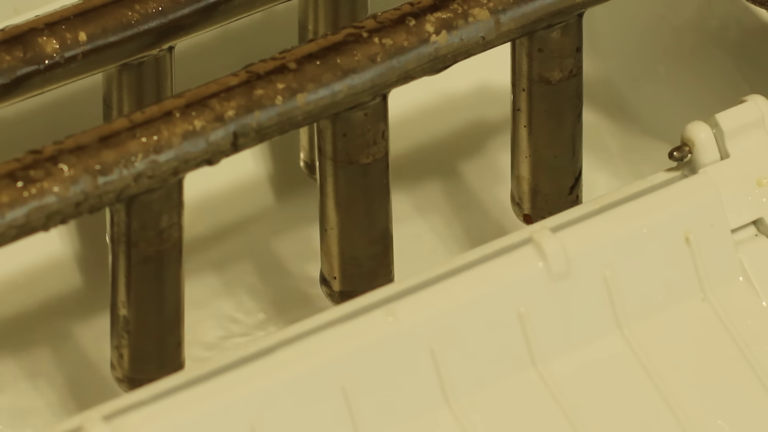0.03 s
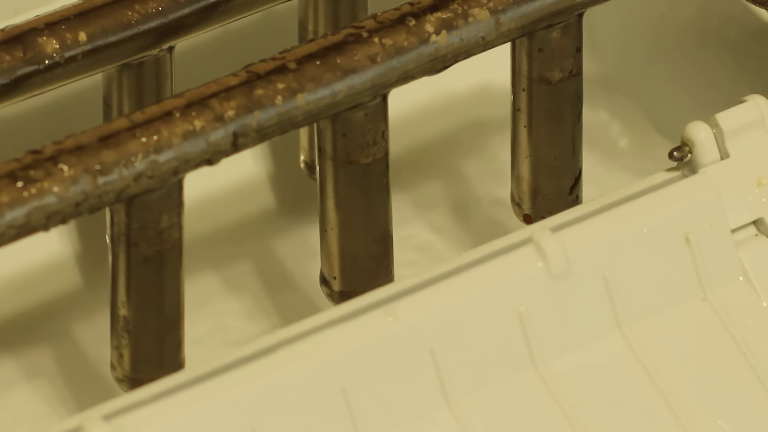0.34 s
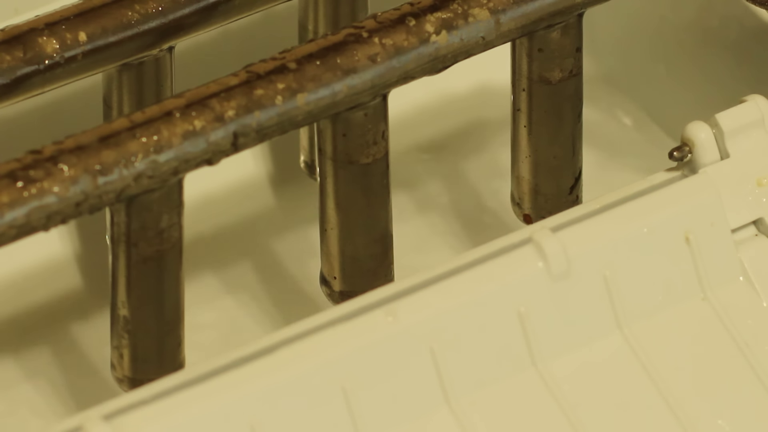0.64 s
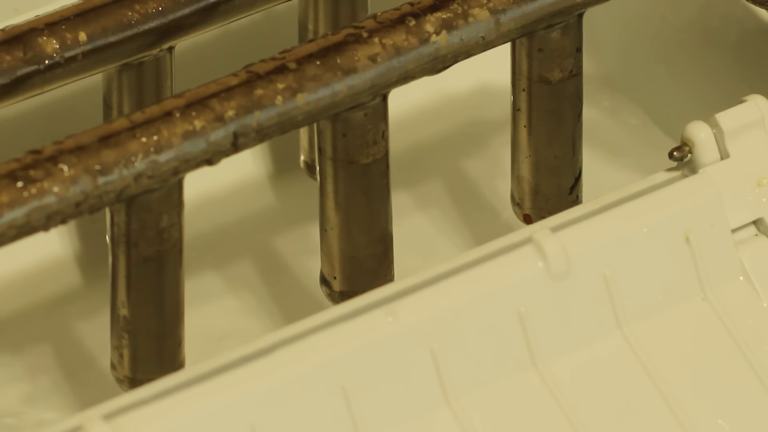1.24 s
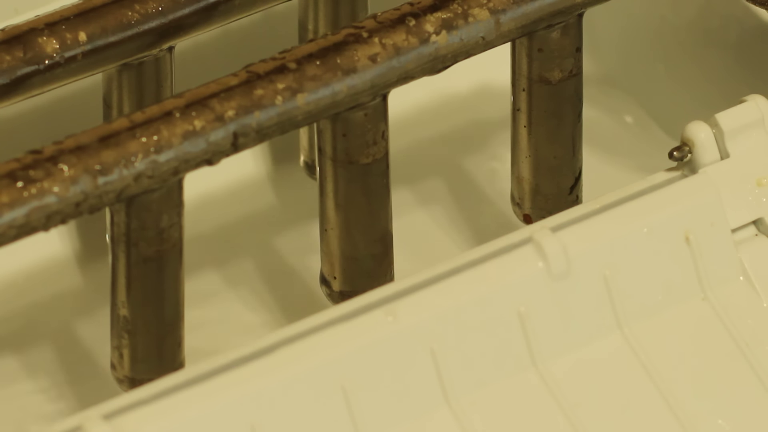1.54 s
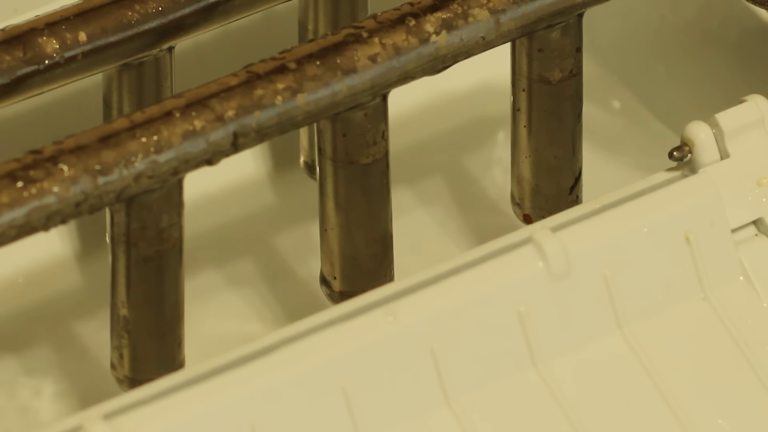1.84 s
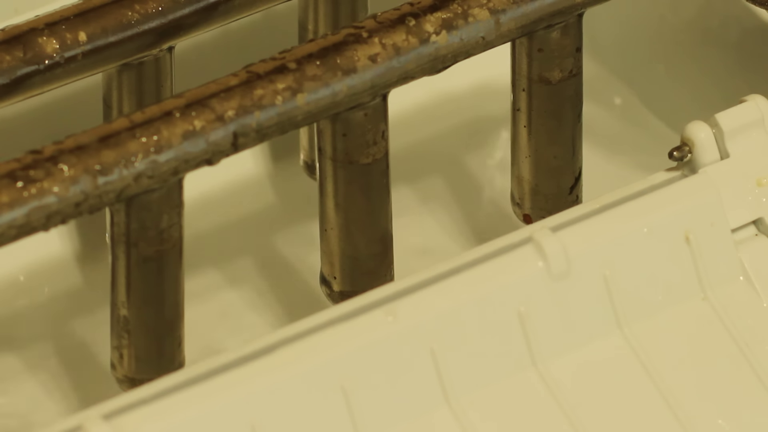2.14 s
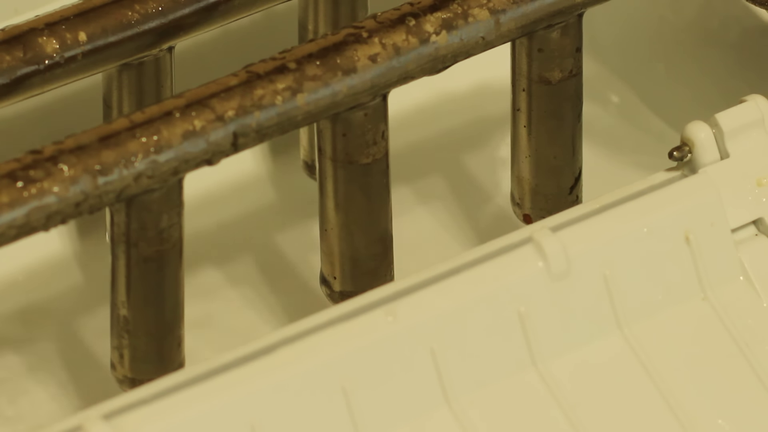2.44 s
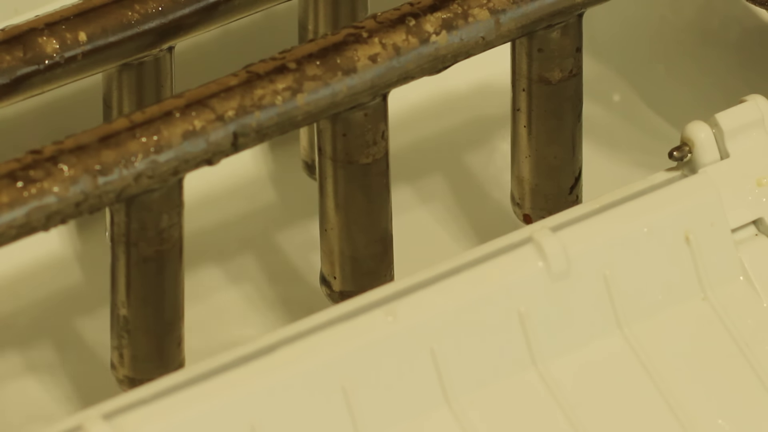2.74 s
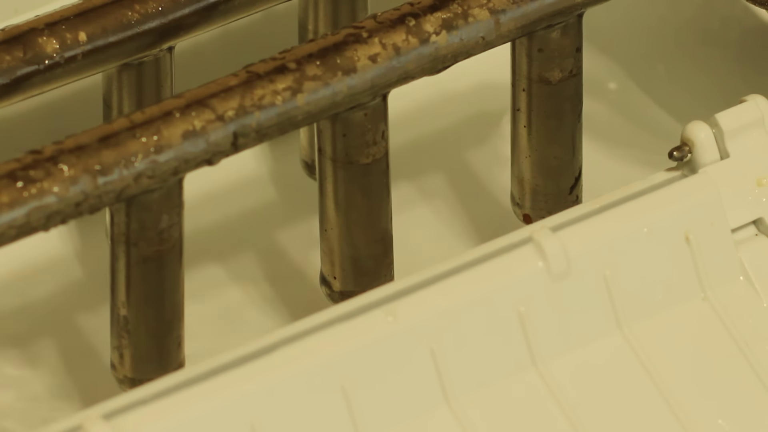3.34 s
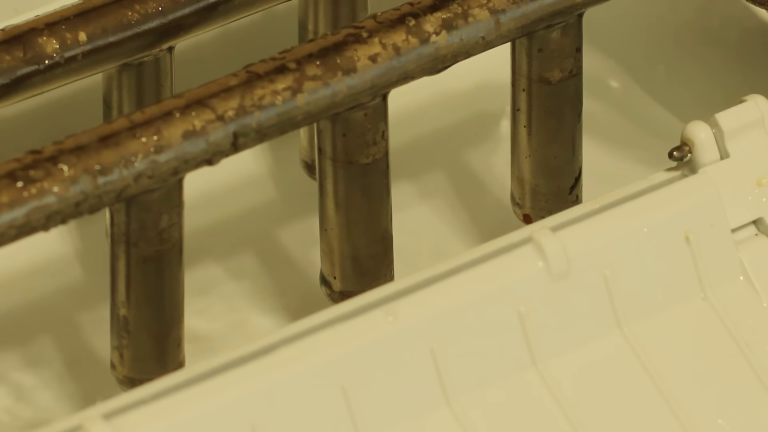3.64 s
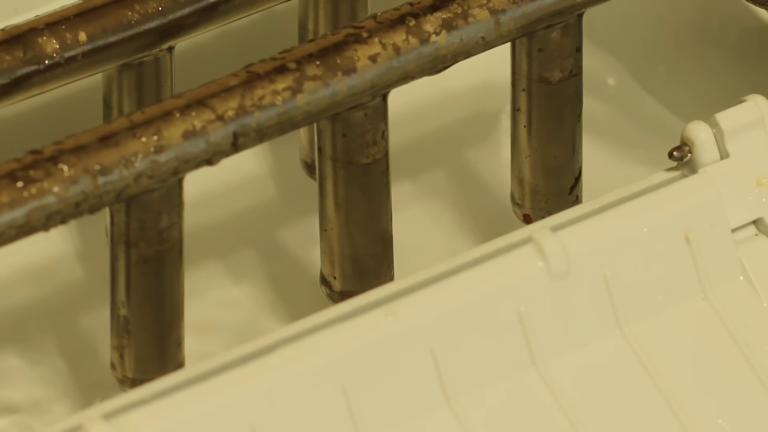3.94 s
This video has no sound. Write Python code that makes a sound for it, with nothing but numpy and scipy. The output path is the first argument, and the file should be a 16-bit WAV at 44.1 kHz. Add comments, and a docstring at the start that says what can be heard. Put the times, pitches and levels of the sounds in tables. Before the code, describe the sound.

Close above the tray of a household ice maker, a brief splash of water knocks against plastic and dies away. Small drips follow and build into a gurgling trickle, over the steady hum of the compressor and fan.

```python
"""Water splashes down in a household ice maker, clacking on the plastic tray and ringing the cabinet.
As the splash dies away, drips and small bubbles tick in the tray and thicken into a trickle; each
bubble is an air pocket resonating against the water around it. Heard from just above the tray, the
compressor and fan hum throughout, while refrigerant hisses in the cooling fingers."""
import sys
import numpy as np
from scipy import signal
from scipy.fft import rfft, irfft
from scipy.io import wavfile

SR = 44100
rng = np.random.default_rng(int(sys.argv[2]) if len(sys.argv) > 2 else 0)


def materialize(psi):
    """Save the field psi as 16-bit PCM at rate SR to the path in sys.argv[1].

    A 1-D psi becomes a single channel; in a 2-D psi each row is a channel.
    """
    bounded = np.clip(np.atleast_2d(psi).T, -1, 1)
    quanta = np.round(bounded * 32767).astype(np.int16)
    wavfile.write(sys.argv[1], SR, quanta)


N = 176400
TIME = np.arange(N) / SR


def amp(db):
    """Amplitude ratio of a level in decibels."""
    return 10 ** (np.asarray(db) / 20)

def unit(x):
    """Normalisation to rms 1."""
    return x / np.sqrt(np.mean(x ** 2) + 1e-20)

def read(points, hz):
    """Interpolation on a log-frequency axis."""
    f, value = np.transpose(points)
    return np.interp(np.log(hz + 1), np.log(f + 1), value)

def curve(points, column=1):
    """Linear interpolation in time."""
    rows = np.array(points)
    return np.interp(TIME, rows[:, 0], rows[:, column])

def add(mix, s, sound):
    """Superposition of a sound starting at s seconds."""
    part = mix[max(round(s * SR), 0):][:len(sound)]
    part += sound[:len(part)]

def coloured(x, gain_db):
    """Spectral shaping by a function of frequency, to rms 1."""
    return unit(irfft(rfft(x) * amp(gain_db(np.fft.rfftfreq(len(x), 1 / SR))), len(x)))

def noise(gain_db, length=N):
    """Spectrally shaped Gaussian noise."""
    return coloured(rng.standard_normal(length), gain_db)

def impulses(per_s):
    """Shot noise: impulses of random time and strength."""
    return rng.standard_normal(N) * (rng.random(N) < per_s / SR)

def high_pass(x, hz, order=4):
    """Attenuation below a cutoff."""
    return signal.sosfilt(signal.butter(order, hz, "high", fs=SR, output="sos"), x)

def drift(rate_hz):
    """Slow fluctuation: low-pass noise."""
    return noise(lambda f: -20 * np.log10(1 + (f / rate_hz) ** 4))

def tone(hz):
    """A sinusoid of rms 1 whose phase is the integral of frequency."""
    return unit(np.sin(2 * np.pi * np.cumsum(hz) / SR))


# compressor and fan tones (frequency [Hz], relative starting level [dB])
MOTOR_TONES = [(269.2, -64.5), (306, -58.5), (500.6, -66), (646, -66.5), (834.4, -69), (915, -59.5),
               (990.5, -64), (1373, -67)]
# swell and ebb of the mains hum (time [s], relative level [dB])
MAINS_ENVELOPE = [(0, -73), (.6, -72), (1.75, -75), (2.22, -66), (2.85, -79), (3.9, -72)]
def hum(mains_hz=60, waver_db=1.5, waver_hz=0.98, swell_db_per_s=1.0):
    """Periodic vibration: motor tones, modulated in level and pitch, over the mains hum."""
    motors = sum(amp(db + waver_db * drift(4.1)) * tone(hz + waver_hz * drift(4.76))
                 for hz, db in MOTOR_TONES)
    mains = amp(curve(MAINS_ENVELOPE) + 1.1 * drift(4.7)) * unit(np.sin(2 * np.pi * mains_hz * TIME))
    return amp(swell_db_per_s * TIME) * motors + mains

# fan air (frequency [Hz], relative spectral density [dB])
AIR_SPECTRUM = [(20, -18), (45, -26), (95, -21), (135, -11.5), (193, -7), (305, -4.5), (421, -3.5),
                (648, -4), (850, -5), (1050, -6.5), (1500, -7.5), (2120, -10), (2900, -13.5), (3900, -14.5),
                (4800, -20), (6000, -24.5), (6700, -23), (7500, -25.5), (11600, -27.5), (13000, -25.5)]
# cabinet response (frequency [Hz], width [Hz], gain [dB])
CABINET_RESONANCES = [(198.7, 21, 4), (345, 26, 4.5), (430, 32, -6), (500, 21, 2), (578, 43, -4.5),
                      (662, 31, 7), (715, 12, 7.5), (737, 23, 0), (797, 37, 5.5), (848, 57, 6.5),
                      (1385, 95, 4)]
def fan_air():
    """Forced resonance: broadband air noise excites the cabinet."""
    def cabinet_db(f):
        return sum(db * np.exp(-(2 * (f - hz) / width) ** 2) for hz, width, db in CABINET_RESONANCES)
    return noise(lambda f: read(AIR_SPECTRUM, f) + cabinet_db(f))

# whistles (frequency [Hz], bandwidth [Hz], relative starting level [dB], fade [dB/s])
HISS_RESONANCES = [(3506, 57, -55.5, 0.5), (8440, 300, -65.5, 1.5), (11160, 190, -59, 2.1),
                   (14000, 200, -72, 1)]
def refrigerant():
    """Narrow resonances filter the flow noise into a whistling hiss."""
    out = np.zeros(N)
    for hz, width, db, fade in HISS_RESONANCES:
        band = noise(lambda f: -20 * np.log10(1 + ((f - hz) / width * 1.33) ** 2))
        out += amp(db - fade * TIME) * band
    return out

# the machine's sound dips under the splash (time [s], gain [dB])
MACHINE_GAIN = [(0, 9), (.11, -9), (.25, -8.5), (.4, -1), (.55, 4.5)]
def machine():
    """Superposition of hum, air and hiss under one envelope."""
    return amp(curve(MACHINE_GAIN)) * (hum() + amp(-43.5) * fan_air() + refrigerant())

# room reverberation (frequency [Hz], T60 [s])
ROOM_DECAY = [(300, 0.54), (3000, 0.5), (8000, 0.27), (15000, 0.17)]
def echoes(room_db, tray_db=-1, tray_t60_s=0.014):
    """Impulse response: early reflections off the tray walls, then the room's diffuse tail."""
    t = np.arange(SR // 2) / SR
    tray = rng.standard_normal(len(t)) * (t > .001) * amp(-60 * t / tray_t60_s)
    diffuse = rng.standard_normal(len(t)) * (t > .006)
    hz, age, bands = signal.stft(diffuse, SR, nperseg=256)
    decay = amp(-60 * age / read(ROOM_DECAY, hz)[:, None])
    room = signal.istft(bands * decay, SR, nperseg=256)[1][:len(t)]
    return amp(tray_db) * tray / np.linalg.norm(tray) + amp(room_db) * room / np.linalg.norm(room)

def surroundings(x, room_db, paths=4, wander_hz=3.1):
    """Reflections depend on position: as the landing point wanders, its echoes change."""
    reflected = np.zeros(N)
    for k in range(paths):
        share = np.sqrt(2 / paths) * np.cos(2 * np.pi * (wander_hz * (1 + k // 2) * TIME + k / paths))
        reflected += signal.fftconvolve(x * share, echoes(room_db))[:N]
    return x + reflected

def bubble(hz, stretch=1.0, pitch_rise=0.022):
    """Damped oscillation: an air pocket swells, rings and rises in pitch; small ones die sooner."""
    t = np.arange(2000) / SR
    time_constant_s = stretch * 0.00065 * (3000 / hz) ** 0.58
    age = t / time_constant_s
    pitch = hz * (1 + pitch_rise * np.tanh((age - 1) / 2))
    return age * np.exp(1 - age) * np.sin(2 * np.pi * np.cumsum(pitch) / SR)

def swarm(low_hz, high_hz, per_s, spread_db, sizes=30):
    """Incoherent sum of bubbles of many sizes."""
    out = np.zeros(N)
    rings = [bubble(hz) for hz in np.geomspace(low_hz, high_hz, sizes)]
    for when, size, chance in rng.random((int(per_s * N / SR), 3)):
        db = spread_db * min(-np.log1p(-chance), 3)  # a few stand out
        add(out, when * N / SR, amp(db) * rings[int(size * sizes)])
    return unit(out)

# running water (time [s], relative gurgle level [dB], relative fizz level [dB])
TRICKLE_ENVELOPES = [(0, -67, -47), (.7, -73, -60), (1.4, -68, -66), (1.95, -53, -61), (2.15, -50, -54),
                     (2.45, -47.5, -53.5), (2.9, -49.5, -55), (3.3, -46.5, -51.5), (3.6, -44.5, -48.5),
                     (4, -46.5, -50.5)]
TICK_LOW_HZ = 3720
def trickle(gurgle_hz=1880, gurgle_octaves=0.56, fizz_db_per_octave=-12):
    """Resonance falls with size: large bubbles gurgle, small ones fizz among tiny clicks."""
    large = swarm(964, 3880, per_s=450, spread_db=3.5)
    gurgle = coloured(large, lambda f: -10 * np.log10(1 + (np.log2((f + 1) / gurgle_hz) / gurgle_octaves) ** 2))
    small = swarm(4350, 16600, per_s=700, spread_db=4.5)
    fizz = coloured(small, lambda f: fizz_db_per_octave * np.log2(1 + f / 2000))
    clicks = unit(high_pass(impulses(per_s=63), TICK_LOW_HZ, order=2))
    clumps = amp(3.3 * drift(12))
    crackle = unit(clumps * (fizz + amp(-5) * clicks))
    return amp(curve(TRICKLE_ENVELOPES, 1)) * gurgle + amp(curve(TRICKLE_ENVELOPES, 2)) * crackle

# rushes of water (time [s], duration [s], centre pitch [Hz], relative level [dB])
GULP_EVENTS = [(2.922, 0.055, 1590, -44), (3.289, 0.078, 2700, -44), (3.703, 0.083, 1560, -37.5),
               (3.845, 0.051, 1600, -40), (3.957, 0.021, 1930, -37.5)]
def gulps(bubbles_per_s=900, scatter_octaves=0.53):
    """Air entrainment: each short rush of water sets a tight cluster of bubbles ringing."""
    out = np.zeros(N)
    for s, length, hz, db in GULP_EVENTS:
        cluster = np.zeros(N)
        for when, size, strength in rng.random((int(bubbles_per_s * length) + 1, 3)):
            pitch = hz * 2 ** (scatter_octaves * (2 * size - 1))
            add(cluster, s + when * length, (2 * strength - 1) * bubble(pitch))
        out += amp(db) * np.sqrt(length * SR) * cluster / np.linalg.norm(cluster)
    return out

# drips and bursting bubbles (time [s], pitch [Hz], ring gain [dB], tick gain [dB])
DRIP_EVENTS = [(.333, 6720, -26, -40), (.561, 13200, -39, -35), (.604, 14500, -30, -37),
               (.698, 5300, -38, -48), (.887, 11700, -31, -44), (1.206, 10422, -33.5, -29.5),
               (1.231, 12000, -30, -40), (1.57, 4030, -33, -48), (1.622, 6700, -31, -34.5),
               (1.848, 9450, -25.5, -27.5), (1.994, 6480, -27.5, -42), (2.072, 1690, -30.5, -49),
               (2.079, 4280, -26.5, -40), (2.102, 6740, -25, -37), (2.14, 3190, -28, -42),
               (2.143, 5870, -24, -32.5), (2.243, 7760, -25.5, -30), (2.25, 5340, -26.5, -42),
               (2.3, 13100, -38.5, -28.5), (2.495, 6340, -30, -37), (2.558, 14600, -27, -27),
               (2.627, 13950, -27, -26), (2.627, 8060, -25, -28.5), (2.6762, 3400, -22, -33),
               (2.696, 3470, -33, -40), (2.784, 4820, -21, -38), (2.802, 2310, -27, -47),
               (2.874, 12700, -35, -31), (2.835, 3200, -33, -45), (2.923, 7700, -30, -43),
               (2.926, 1844, -26, -46), (3.036, 1930, -31, -51), (3.062, 14700, -24.5, -40),
               (3.108, 3260, -29.5, -46), (3.151, 3420, -16, -27), (3.154, 4700, -26.5, -29),
               (3.179, 13100, -30, -31), (3.192, 6200, -35, -40), (3.234, 10850, -32.5, -37),
               (3.266, 6400, -33, -38), (3.299, 2930, -30.5, -48), (3.321, 2430, -26.5, -39),
               (3.339, 10422, -32, -32), (3.398, 1880, -30, -31), (3.463, 7235, -33, -45),
               (3.553, 3930, -29.5, -33), (3.563, 7030, -29.5, -32.5), (3.615, 1804, -26.5, -47),
               (3.708, 1356, -28, -50), (3.735, 1790, -23.5, -35), (3.743, 1360, -29, -28),
               (3.784, 3190, -26, -40), (3.792, 4800, -32, -36), (3.817, 2840, -26, -38),
               (3.848, 1907, -22.5, -40), (3.871, 1820, -23, -45), (3.913, 3340, -17, -30),
               (3.961, 2660, -25.5, -43)]
def drips(grains_per_s=6000, tick_s=0.0014, satellites=3, satellite_db=-10, scatter_octaves=0.4):
    """Impact and bubble resonance: a crackling tick, a ring, then weaker satellite bubbles."""
    out, t = np.zeros(N), np.arange(2000) / SR
    for s, hz, ring_db, tick_db in DRIP_EVENTS:
        grains = rng.choice([-1., 1.], len(t)) * (rng.random(len(t)) < grains_per_s / SR)
        grains[0] = 1
        tick = high_pass(unit(grains) * np.exp(-t / tick_s), TICK_LOW_HZ, order=2)
        add(out, s, amp(ring_db) * bubble(hz) + amp(tick_db) * tick)
        for delay, size in rng.random((satellites, 2)):
            satellite = bubble(hz * 2 ** (scatter_octaves * (2 * size - 1)))
            add(out, s + delay * 70 / hz, amp(ring_db + satellite_db) * satellite)  # up to 70 cycles late
    return out

# plastic tray (frequency [Hz], gain [dB], T60 [s])
PLASTIC_MODES = [(257, -28.5, 0.03), (360, -26, 0.096), (500, -20, 0.08), (3800, -12, 0.014),
                 (4630, -10, 0.016)]
def clack(at_s=.0882, crack_s=0.0012, crack_top_hz=7000):
    """Impulse excitation: the hardest blow cracks on the tray and leaves its modes ringing."""
    out, t = np.zeros(N), np.arange(SR // 4) / SR
    crack = noise(lambda f: -10 * np.log10(1 + (f / crack_top_hz) ** 2), len(t))
    ring = sum(amp(db - 60 * t / t60) * np.sin(2 * np.pi * hz * t) for hz, db, t60 in PLASTIC_MODES)
    add(out, at_s, amp(-6) * crack * np.exp(-t / crack_s) + ring)
    return out

# low cabinet resonances (frequency [Hz], width [Hz], level at the peak [dB])
BOOM_MODES = [(337, 23, -30), (366.6, 23, -44), (508, 30.6, -36.5)]
def boom(peak_s=0.082, slope_db_per_s=97):
    """Resonant response: the cabinet's modes build up and decay under the splash."""
    modes = sum(amp(db + 1.7 * drift(30)) * tone(hz + width / 2 * drift(32))
                for hz, width, db in BOOM_MODES)
    return modes * amp(-slope_db_per_s * abs(TIME - peak_s))

# churning water (time [s], level [dB])
CHURN_ENVELOPE = [(0, -25), (.05, -25.5), (.11, -29), (.16, -33.5), (.21, -31.5), (.28, -32), (.35, -38.5),
                  (.44, -38.5), (.55, -43.5), (.8, -70)]
# splashing water (frequency [Hz], relative spectral density [dB])
SPLASH_SPECTRUM = [(100, -51), (220, -12.5), (330, -4.5), (520, -4.5), (780, -5), (1000, -3.5), (1170, 1),
                   (1500, -1.5), (1800, 0.5), (2300, -7.5), (3300, -8.5), (5000, -10), (5800, -16.5),
                   (7700, -20), (9700, -26.5), (16000, -30)]
def splash():
    """Shot noise: the dense impacts of falling water merge into a churn."""
    spatter = coloured(impulses(per_s=16000), lambda f: read(SPLASH_SPECTRUM, f))
    return spatter * amp(curve(CHURN_ENVELOPE))

# slaps of water (time [s], spray gain [dB], treble lift [dB/octave], air pitch [Hz], air gain [dB])
SLAP_EVENTS = [(.046, -21, 8, 1150, -36), (.051, -15, 10, 1144, -12.5), (0.0884, -6.5, 4.5, 1830, -9.5),
               (.0925, -10.5, -14, 1110, -16), (0.1696, -18, 3, 1710, -22), (0.1768, -15.5, 2.5, 1690, -20),
               (.183, -21.5, 3, 1700, -17.5), (0.2225, -26, 4, 1180, -19), (0.2643, -26.5, 11, 910, -25),
               (.296, -25.5, 8, 1710, -24), (0.3407, -24.5, 1, 1130, -28), (0.3718, -22.5, -1, 920, -24.5),
               (.416, -26, -3, 1700, -35), (.743, -25.5, -7, 2000, -30.5)]
def slaps(spray_s=0.0056, crack_s=0.00064):
    """Impact transients: each slap is a crack, a short spray and a resonating pocket of trapped air."""
    out, t = np.zeros(N), np.arange(2048) / SR
    envelope = (np.exp(-t / spray_s) + amp(1) * np.exp(-t / crack_s)) / 2
    for s, db, lift, hz, air_db in SLAP_EVENTS:
        spray = noise(lambda f: read(SPLASH_SPECTRUM, f) + lift * np.log2(1 + f / 3000), len(t))
        add(out, s, amp(db) * spray * envelope)
        add(out, s, amp(air_db) * bubble(hz, stretch=1.44))
    return out

def scene():
    """Superposition of the running machine and the water in its tray."""
    water = clack() + surroundings(slaps() + gulps() + trickle(), room_db=-6.5)
    water += surroundings(drips(), room_db=-4.5)  # drips ring on in the tub
    return (machine() + splash() + boom() + amp(-2.5) * high_pass(water, hz=238))[None]

def record(dry, edge_hz=16000):
    """Clipping at full scale, then band limiting."""
    low_pass = signal.firwin(511, edge_hz, window=("kaiser", 9), fs=SR)
    return signal.oaconvolve(np.clip(dry, -1, 1), low_pass[None], "same")


dry = scene()
out = record(dry)
materialize(out)
```